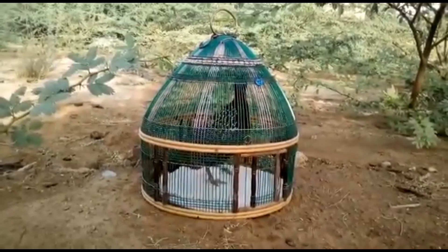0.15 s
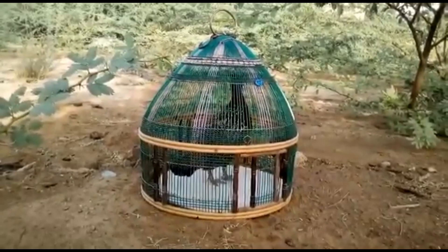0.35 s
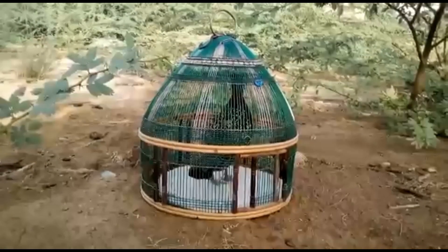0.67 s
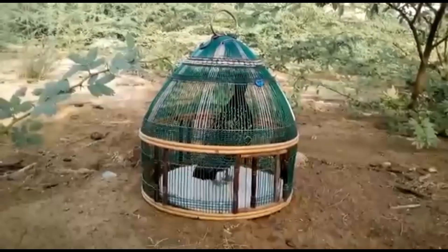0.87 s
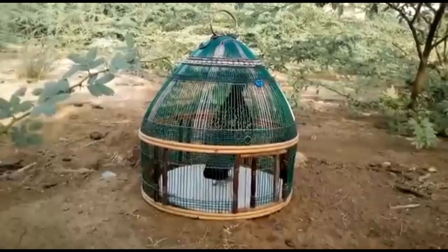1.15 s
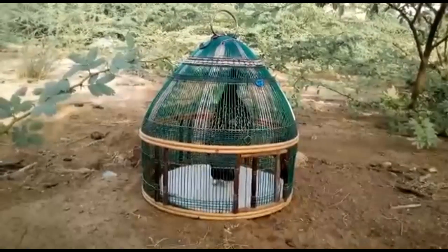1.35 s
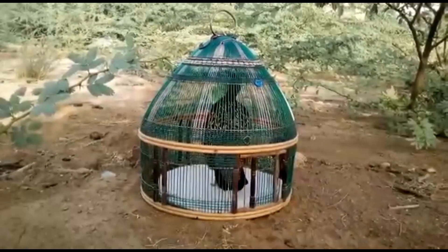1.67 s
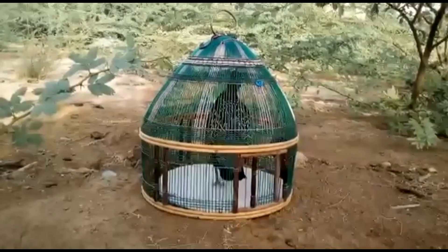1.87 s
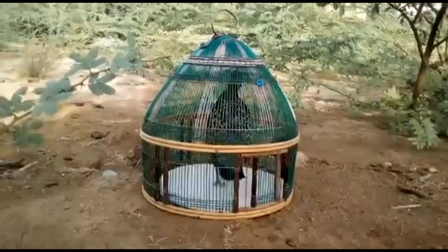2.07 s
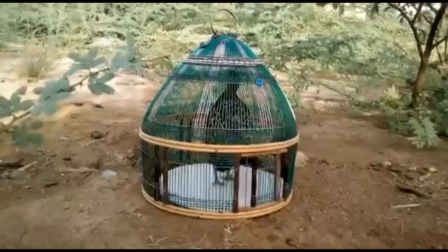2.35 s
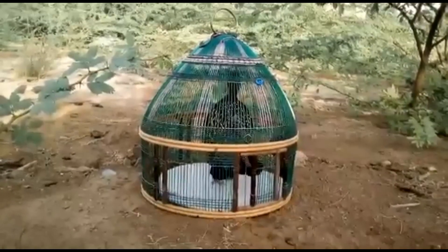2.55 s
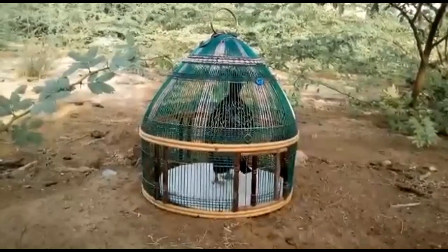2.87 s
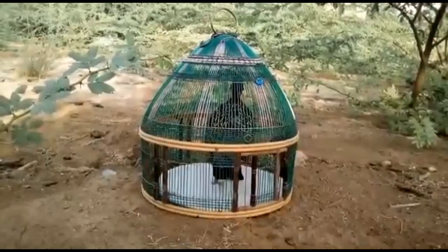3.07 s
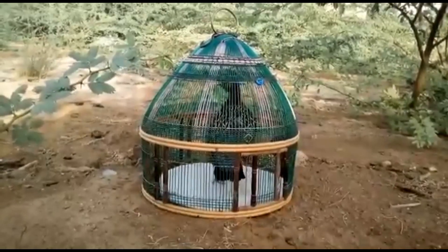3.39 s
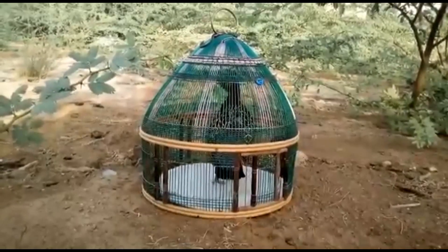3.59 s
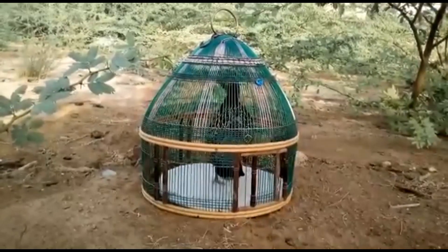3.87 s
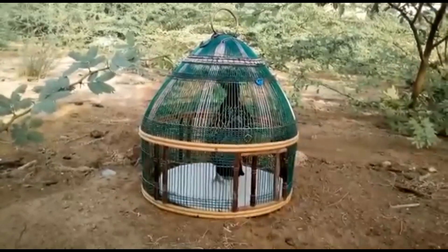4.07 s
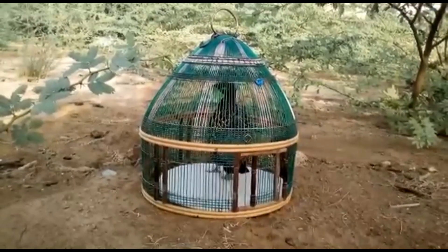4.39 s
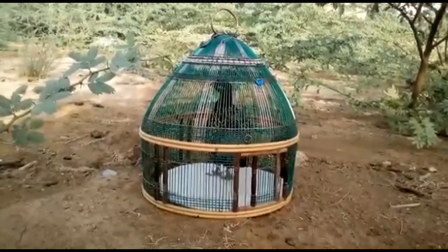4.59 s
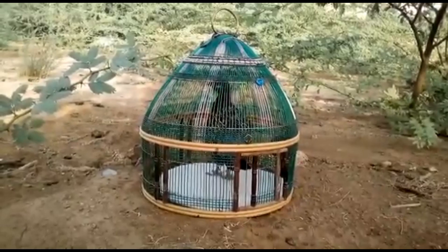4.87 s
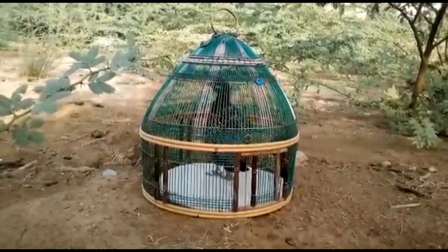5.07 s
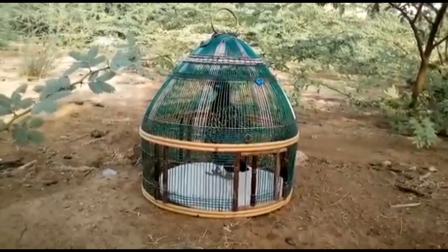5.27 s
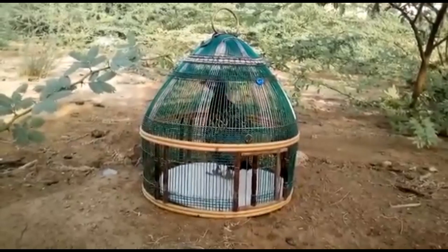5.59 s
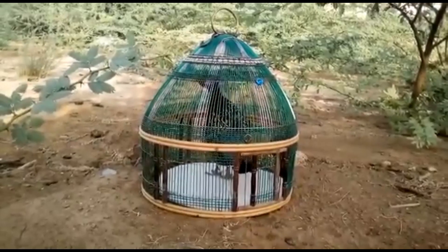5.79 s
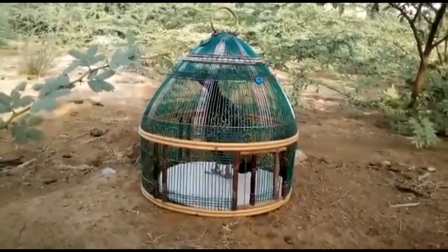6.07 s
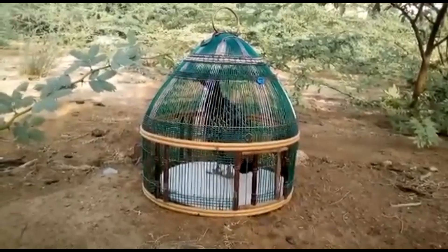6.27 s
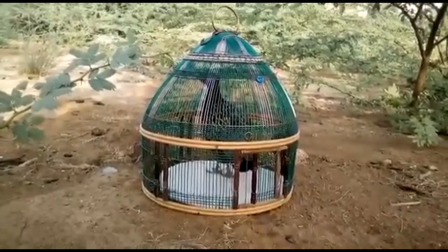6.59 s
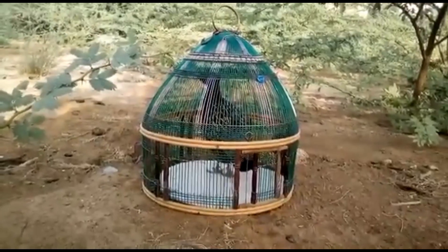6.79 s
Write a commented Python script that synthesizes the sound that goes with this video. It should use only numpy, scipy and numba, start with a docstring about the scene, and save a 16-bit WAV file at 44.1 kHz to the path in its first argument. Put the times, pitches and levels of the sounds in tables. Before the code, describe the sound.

A caged francolin bursts into loud, grating, overloading rasps after a sharp cluck, while distant birds pipe and twitter over a faint low motor hum.

```python
"""Open ground with scrub around: a francolin in a small cage calls close to the microphone.
It gives a cluck, grating rasps and thin whistles, which the scrub throws back blurred.
Far off a bird pipes in phrases, small birds twitter in noise-smeared sweeps, and motors hum as wavering lines;
faint ticks, distant rumble and microphone hiss fill in.
The recorder turns itself down under the calls and overloads on their peaks."""
import sys
import numpy as np
from scipy import signal
from scipy.fft import rfft, irfft, next_fast_len
from scipy.io import wavfile
from scipy.ndimage import uniform_filter1d
from numba import njit

SR = 44100
rng = np.random.default_rng(int(sys.argv[2]) if len(sys.argv) > 2 else 0)


def file_out(sig):
    """Save sig as 16-bit WAV at sys.argv[1]."""
    # one column per channel
    cols = np.atleast_2d(sig).T
    # limit, then scale
    lim = np.clip(cols, -1, 1)
    pcm = np.round(lim * 32767).astype(np.int16)
    wavfile.write(sys.argv[1], SR, pcm)


def elevation(decibels):
    """Turn decibel levels (scalar or array-like) into linear amplitude ratios."""
    levels = np.asarray(decibels, float)
    return 10 ** (levels / 20)


N = 306054

# The caged bird, close; its levels stand before NEAR_DB.
# rasped syllables: start_s, end_s, attack_s, release_s, level_db, flap_start_hz, upper_start_hz, roughness (0-1)
RASPS = [(1.829, 1.875, .001, .012, -1.5, 261.6, 5910, 0.7),
         (2.256, 2.416, .007, .014, -5.5, 285.4, 5226, 0.62),
         (2.6059, 2.86, .026, 0.018, -5.5, 278.6, 5225, 0.69), (3.107, 3.206, .010, .014, -6, 264, 5080, 1),
         (3.265, 3.452, .009, 0.018, -6.5, 270.9, 5114, .9)]
# throat resonances of the rasp's breath: centre_hz, width_hz, level_db (before roughness scales it)
THROAT = [(4300, 590, -4.5), (3700, 500, -15.5), (5000, 230, -16.5), (2800, 900, -23), (1184.6, 1500, -44)]
# bands of the rasp below its main tone: pitch_hz, level_db, lag_cycles
LOW_BANDS = [(1584, -42, 0.38), (2602, -24, 0.34), (3150, -22, 0.93)]
# level curve of the opening cluck: time_s, level_db
CLUCK_LEVEL = [(1.786, -34.5), (1.789, -24), (1.791, -6.5), (1.808, -11), (1.8095, -18), (1.812, -13),
               (1.8145, -21), (1.819, -22), (1.827, -28)]
# colour of the cluck's partials: pitch_hz, level_db
CLUCK_COLOUR = [(800, -45), (1650, -11), (2500, -12), (3300, -13), (4200, -1), (5000, 0), (5900, -6),
                (6700, -14), (8000, -45)]
# whistles that break into the rasps or open them: start_s, length_s, top_hz, bend_hz, level_db
WHISTLES = [(1.828, 0.035, 6520, 1300, -9), (2.784, 0.037, 6385, 700, -12), (3.331, .0235, 6465, 350, -12)]
# Returns from the scrub.
# blurred echoes: delay_s, spread_s, level_db (before the leaves' filter)
ECHOES = [(0.168, 0.029, -51.5), (0.432, 0.046, -47), (.6, .12, -58)]
# The far bird; its pitches stand before scoop, sag and droop.
# piped notes without a first partial: start_s, length_s, second_start_hz, second_end_hz, second_level_db,
# third_relative_db, fourth_relative_db, catch_hz, catches_s (until they cease)
PIPING = [(0.1958, 0.066, 2940, 2800, -40, -1.5, -1, 115.4, 0.076),
          (.320, 0.083, 2830, 2790, -45.5, -8, 0, 80.3, 0.049),
          (1.209, 0.064, 2700, 2808, -42, 1.5, -2, 107, .04),
          (1.33, 0.07, 2750, 2777, -42.5, 5.5, 5, 74.4, 0.066),
          (1.452, 0.089, 2760, 2700, -43.5, 2, 4.5, 71.66, .07),
          (2.213, 0.058, 2740, 2690, -45.5, -10.5, -16, 90.7, .05),
          (2.494, 0.11, 2780, 2684, -39, -7, -13.5, 84, .06),
          (3.491, 0.098, 2680, 2552, -60, -8, 4, 80, 0.057)]
# slides that close a phrase: start_s, length_s, second_hz, second_level_db, third_relative_db, fourth_relative_db
SLIDES = [(.458, 0.262, 2800, -48.5, -2, 2.5), (1.6075, 0.175, 2702, -46, 3, 0),
          (3.650, .2, 2620, -60, 6, -12)]
# course of every slide: length_share, pitch_ratio, level_db
SLIDE_COURSE = [(0, 1, -2.5), (.12, 0.98, -1), (.42, .94, -3.5), (.6, 0.86, -4.5), (.75, .73, -16.5),
                (1, 0.86, -4)]
# Small birds.
# twittered sweeps: start_s, length_s, start_hz, middle_hz, end_hz, level_db (in the middle)
TWITTER = [(.322, 0.1, 4000, 4880, 3950, -53.5), (.685, 0.042, 4230, 4100, 4560, -55),
           (.733, .038, 3620, 4380, 3570, -49), (.812, 0.043, 4000, 4650, 3900, -51),
           (.862, 0.05, 3700, 4380, 3900, -53.5), (.920, 0.045, 3950, 4420, 3600, -52),
           (1.040, 0.057, 4950, 4700, 4000, -62), (1.055, 0.034, 4020, 4400, 3900, -55),
           (1.632, 0.025, 4300, 4670, 4870, -45), (1.662, 0.031, 4883, 5273, 5150, -56),
           (1.695, 0.038, 5280, 4500, 3720, -47), (2.000, 0.055, 3780, 4960, 4000, -64),
           (2.172, 0.028, 4000, 4730, 3840, -60.5), (4.785, 0.031, 4020, 3730, 4600, -51.5),
           (4.815, .055, 4657, 4750, 4540, -63), (5.160, 0.023, 4070, 4590, 4100, -43),
           (5.190, 0.032, 4070, 5100, 5100, -53), (5.220, 0.04, 4960, 4260, 3920, -45),
           (5.255, 0.028, 3980, 4300, 5000, -48.5), (5.310, .027, 4800, 4700, 4050, -49),
           (5.362, 0.032, 4420, 4025, 4600, -48), (5.405, 0.04, 4490, 3900, 3100, -58.5),
           (5.290, 0.019, 4300, 4500, 4700, -58), (5.860, .014, 4524, 4900, 5200, -60),
           (5.878, 0.026, 4420, 3680, 4100, -58), (5.910, 0.027, 4300, 3680, 4600, -54),
           (5.945, 0.021, 3360, 3560, 2440, -61), (6.262, .03, 3780, 4330, 5800, -57.5),
           (6.292, 0.026, 5750, 5640, 5160, -65), (6.320, .025, 4330, 4200, 3900, -54.5),
           (6.345, .025, 4250, 4000, 4040, -59), (6.375, 0.024, 4000, 4400, 4720, -57.5),
           (6.848, .012, 4200, 4790, 5100, -53), (6.864, .022, 4400, 3820, 3850, -57),
           (6.898, .01, 3840, 4100, 4300, -57.5), (6.905, .024, 3700, 3900, 4850, -51),
           (6.325, 0.019, 4300, 4900, 5200, -61), (6.528, .03, 3610, 3920, 4800, -64)]
# plain faint whistles: start_s, length_s, start_hz, middle_hz, end_hz, level_db (in the middle)
PEEPS = [(1.030, 0.059, 2700, 2460, 2370, -56.5), (1.030, 0.056, 3400, 3760, 3130, -53),
         (1.082, 0.068, 2620, 2844, 2700, -54), (1.118, 0.039, 3720, 3800, 3450, -55.5),
         (4.764, 0.046, 2430, 2400, 2420, -57.5), (5.200, 0.07, 2480, 2360, 2470, -64),
         (5.540, .03, 2620, 2610, 2600, -68.5), (6.205, 0.051, 2326, 2390, 2200, -63),
         (6.510, 0.046, 5160, 5130, 5170, -61.5)]
# faint ticks: start_s, level_db (at the onset), pitch_hz
TICKS = [(.330, -29, 3320), (.344, -36, 4200), (.482, -32, 3800), (.519, -36, 3550), (5.6644, -44.5, 5780),
         (5.6715, -37, 5790), (5.7404, -44, 5990), (5.7915, -44, 3900), (5.9646, -34.5, 2900)]
# The distance.
# lasting low motor line: time_s, pitch_hz, level_db
HUM_LOW = [(0, 101.5, -55), (.3, 101.7, -48), (1.25, 101.7, -47.5), (1.8, 101.6, -56.5), (2.7, 103, -57.5),
           (3.0, 102, -49), (3.6, 101.5, -51.5), (4.55, 101, -52), (4.76, 93, -48), (5.06, 100, -52),
           (6.94, 101.4, -49)]
# passing motor lines, one table each: time_s, pitch_hz, level_db
HUM_PASSING = [
    [(2.7, 147, -55), (2.92, 146, -47), (3.5, 141.8, -48.5), (4.34, 135.3, -46.5), (4.7, 135, -56)],
    [(4.7, 179.3, -51.5), (5.63, 171, -54.5), (6.94, 174, -57)],
]
# lines above the low one: pitch_multiple, relative_db
HUM_ORDERS = [(2, -19), (2.5, -15.5), (3, -14)]
# colour of rumble and hiss: pitch_hz, relative_db (per Hz)
AIR_COLOUR = [(12, -52), (20, -22), (38, -15.5), (80, -3), (106, 0), (252, -7), (668, -21), (908, -24.5),
              (2920, -26), (4320, -22.5), (6550, -31), (8190, -46.5), (13100, -43.5), (14300, -37),
              (15500, -49.5)]

NEAR_DB = 11.5   # the near bird stands this much above its own table levels
MAIN_HZ, MAIN_SAG_HZ_PER_S = 4208, 130
MAIN_ARCH_HZ, MAIN_ARCH_S = 128.6, .075   # the main tone rises and drops back early in a syllable
UPPER_CLIMB_HZ_PER_S, FLAP_SAG_HZ_PER_S = 2500, 60
UPPER_START_DB, UPPER_FULL_DB, UPPER_GROWS_S = -14.5, -9, 0.12
RESUMED_UPPER_HZ, RESUMED_UPPER_DB, RESUMED_FLAP_HZ, RESUMED_DB = 5330, -8, 260.5, -0.5   # after a whistle
RASP_START_DB, RASP_END_DB = -21.5, -29   # added at the very ends
RASP_FADE_S, RASP_FADE_DB = .035, -3   # slight fade towards the end
LOW_ONSET_DB, LOW_ONSET_S = 16.5, 0.012   # the lowest band flares as a syllable opens
STROKE_FLOOR, STROKE_SHARPNESS = .25, 3.0   # level between strokes; narrowness
EVENING = .65   # share of the level swings that steady pressure irons out
CLUCK_START_HZ, CLUCK_END_HZ, CLUCK_FALL_S = 1092, 813.4, 0.0049
CLUCK_BREATH_DB, CLUCK_BREATH_RISE_DB, CLUCK_BREATHY_S = -12.5, 24.5, 1.8115   # breath over voice; when it rises
WHISTLE_TOP, WHISTLE_DIP_DB = 0.78, -2   # share of the length at the top; level change there
WHISTLE_PLUNGE_HZ = 2200   # the pitch falls back to the rasp as the whistle ends
OVERLAP_S = .002   # the rasp lasts this long into the whistle
SCRUB_DB, SCRUB_T60_S = -26.5, 0.35   # wash level before the leaves' filter; decay
PIPING_PEAK, PIPING_SWELL_DB = 0.65, 9   # loudest at this share of the note
FIFTH_DB = -15   # fifth partial relative to the fourth
SLIDE_DULLS_DB = -16   # added to the upper partials by the end of a slide
FIRST_CATCH_S, CATCH_CLICK_DB = 0.0094, -6   # the voice first shuts this soon; each reopening clicks
SLIDE_CATCH_HZ, SLIDE_CATCHES_S = 78, .055
TWITTER_SWELL_DB = 2.5
AIR_DB = -47


def rasps():
    """The membrane whistles in strokes: each swells, climbs and breaks off; side bands answer later in the cycle."""
    out = np.zeros(N)
    for start, end, attack_s, release_s, level, flap_start_hz, upper_start_hz, rough in RASPS:
        at, gate, t = span(start, end - start, edge_s=0.0019)
        left = end - start - t
        db = level + RASP_START_DB * np.clip(1 - t / attack_s, 0, 1) ** 2
        db += RASP_END_DB * np.clip(1 - left / release_s, 0, 1)
        db += RASP_FADE_DB * np.clip(1 - left / RASP_FADE_S, 0, 1)
        flap_hz = flap_start_hz - FLAP_SAG_HZ_PER_S * t
        main_arch = np.sin(np.pi * np.minimum(t / MAIN_ARCH_S, 1) ** 2)
        main_hz = MAIN_HZ - MAIN_SAG_HZ_PER_S * t + MAIN_ARCH_HZ * main_arch
        upper_hz = upper_start_hz + UPPER_CLIMB_HZ_PER_S * t
        upper_db = UPPER_FULL_DB + (UPPER_START_DB - UPPER_FULL_DB) * np.clip(1 - t / UPPER_GROWS_S, 0, 1)

        # past the middle of a whistle inside the syllable, the rasp takes a new setting
        resumed = sum((start < s) & (at / SR > s + length / 2) for s, length, *_ in WHISTLES) > 0
        upper_hz[resumed] = RESUMED_UPPER_HZ
        upper_db[resumed] = RESUMED_UPPER_DB
        flap_hz[resumed] = RESUMED_FLAP_HZ
        db += RESUMED_DB * resumed

        cycle = np.cumsum(flap_hz * (1 + .055 * rough * drift(150, len(at)))) / SR + .2
        bend = .016 * drift(30, len(at))   # all bands bend together as the neck moves

        def strokes(hz, lag, climb):
            """One tone pulsed and bent by the flap cycle; rms 1."""
            place = (cycle - lag) % 1
            swell = STROKE_FLOOR + np.sin(np.pi * place ** 1.2) ** STROKE_SHARPNESS
            flicker = elevation(4.5 * rough * drift(600, len(at)))
            wobble = 1 + climb * (place - .55) + bend + .02 * rough * drift(500, len(at))
            tone = np.sin(turns(uniform_filter1d(hz * wobble, size=12)))
            return rms_one(swell * flicker * tone)

        voice = strokes(main_hz, 0, climb=0.29)
        voice += elevation(upper_db) * strokes(upper_hz, 0.71, climb=0.3)
        for hz, level_db, lag in LOW_BANDS:
            flare_db = LOW_ONSET_DB * np.exp(-t / LOW_ONSET_S) * (hz < 2000)
            voice += elevation(level_db + flare_db) * strokes(hz, lag, climb=0.14)
        breath = rng.standard_normal(len(at))
        breath *= .5 + np.sin(np.pi * (cycle - .1)) ** 2   # the air comes in puffs with the strokes
        for hz, width_hz, level_db in THROAT:
            voice += rough * elevation(level_db) * twice(breath, hz, width_hz)
        voice += elevation(-20) * twice(breath, 1.06 * upper_hz, 460)
        voice /= smooth_power(voice, size=160) ** (EVENING / 2)
        out[at] += gate * elevation(db) * rms_one(voice)
    for start, length, *_ in WHISTLES:   # the rasp is silent while the bird whistles
        at, gate, _ = span(start + OVERLAP_S, length - OVERLAP_S, edge_s=.002)
        out[at] *= 1 - gate
    return out


def cluck():
    """A falling stack of unsteady partials with breath in the throat."""
    at, gate, (db,) = note(CLUCK_LEVEL, edge_s=0.0021)
    t = at / SR
    hz = CLUCK_END_HZ + (CLUCK_START_HZ - CLUCK_END_HZ) * np.exp(-((t - t[0]) / CLUCK_FALL_S) ** 2)
    breath_db = CLUCK_BREATH_DB + CLUCK_BREATH_RISE_DB / (1 + np.exp((CLUCK_BREATHY_S - t) / .0015))
    phase = turns(hz * (1 + .02 * drift(400, len(at))))
    stack = np.zeros(len(at))
    for k in range(2, 11):
        partial_db = at_hz(CLUCK_COLOUR, k * hz) + 3.5 * drift(300, len(at))
        stack += elevation(partial_db) * np.sin(k * phase + k * k)
    air_flow = rng.standard_normal(len(at))
    breath = twice(air_flow, 4100, 800)
    breath += elevation(-16) * twice(air_flow, 4900, 600)
    breath += elevation(-14.5) * twice(air_flow, 3100, 900)
    voice = rms_one(stack) * elevation(-breath_db) + breath
    out = np.zeros(N)
    out[at] = gate * elevation(db) * voice / np.sqrt(smooth_power(voice, size=200))   # steady pressure evens the level
    return out


def whistles():
    """A clean tone that takes the rasp's place for a moment, with a fading octave below and breath in the throat."""
    out = np.zeros(N)
    for start, length, top_hz, bend_hz, level in WHISTLES:
        at, gate, t = span(start, length, edge_s=0.0014)
        off_top = (t / length - WHISTLE_TOP) ** 2
        plunge = WHISTLE_PLUNGE_HZ * np.exp((t - length) / .0012)
        hz = top_hz - bend_hz * off_top - plunge
        db = level + WHISTLE_DIP_DB * np.exp(-off_top / .04)
        phase = turns(hz / 2)
        octave_below = elevation(-21.5) * np.exp(-t / 0.0097) * np.sin(phase)
        gate = gate * elevation(.8 * drift(200, len(at)))
        breath = elevation(-20.5) * twice(rng.standard_normal(len(at)), 4200, 560)
        out[at] += gate * elevation(db) * (np.sqrt(2) * (np.sin(2 * phase) + octave_below) + breath)
    return out


def scrub(x):
    """Leaves scatter a dying wash; banks of trees return blurred echoes."""
    t = np.arange(int(1.2 * SR)) / SR
    wash = (t > .01) * elevation(-60 * t / SCRUB_T60_S)
    shape = elevation(SCRUB_DB) * wash / np.sqrt(np.sum(wash ** 2))
    for delay_s, spread_s, db in ECHOES:
        clump = np.exp(-.5 * ((t - delay_s) / spread_s) ** 2)
        shape = np.hypot(shape, elevation(db) * clump / np.sqrt(np.sum(clump ** 2)))
    scatter = shape * rng.standard_normal(len(t))
    scatter *= elevation(3.0 * drift(25, len(t)))   # bushes stand unevenly
    # the main tone is beamed forward, less of it returns
    scatter -= .65 * resonate(scatter, np.full(len(t), 4000.), 1400., SR)
    leaves = signal.butter(2, [2600, 7000], "band", fs=SR, output="sos")   # leaves return only the treble
    return signal.fftconvolve(x, signal.sosfilt(leaves, scatter))[:N]


def piping():
    """Short notes swell and glide a little; the last note of a phrase slides down, dulls and turns up."""
    out = np.zeros(N)
    for start, length, start_hz, end_hz, db, third_db, fourth_db, catch_hz, catches_s in PIPING:
        at, gate, t = span(start, length, edge_s=.0015)
        level = db - PIPING_SWELL_DB * (t / length - PIPING_PEAK) ** 2
        levels = level + np.c_[[0, third_db, fourth_db, fourth_db + FIFTH_DB]]
        hz = start_hz + (end_hz - start_hz) * t / length
        out[at] += gate * piped(t, hz, levels, catch_hz, catches_s)
    share, ratio, slide_db = np.transpose(SLIDE_COURSE)
    for start, length, hz, db, third_db, fourth_db in SLIDES:
        at, gate, t = span(start, length, edge_s=.0015)
        level = db + np.interp(t / length, share, slide_db)
        upper = level + SLIDE_DULLS_DB * (t / length) ** 2
        levels = level, upper + third_db, upper + fourth_db, upper + fourth_db + FIFTH_DB
        sliding_hz = hz * uniform_filter1d(np.interp(t / length, share, ratio), size=600)
        out[at] += gate * piped(t, sliding_hz, levels, SLIDE_CATCH_HZ, SLIDE_CATCHES_S)
    return out


def piped(t, hz, levels, catch_hz, catches_s):
    """Partials two to five of a clear voice that catches in quick beats, widely as a note starts."""
    gap = .12 + .45 * np.exp(-t / .02)   # share of each beat that is shut
    beat = (catch_hz * (t - FIRST_CATCH_S) * (1 + .04 * drift(60, len(t)))) % 1
    depth = (t > FIRST_CATCH_S / 2) * np.exp(-(t / catches_s) ** 6)
    catch = uniform_filter1d((beat < gap) * (t > FIRST_CATCH_S) * depth, size=60)
    sag = uniform_filter1d(catch, size=200)
    ending = np.exp((t - t[-1]) / 0.0042)   # the note droops and fades as it closes
    # the pitch scoops up at first and sags round each catch
    phase = turns(hz / 2 * (1 - .07 * sag - .075 * ending - .03 * np.exp(-t / .02)))
    reopening = np.exp(-((beat - gap) / catch_hz / .0008) ** 2)
    click = depth * reopening * twice(rng.standard_normal(len(t)), 4300, 3000)
    voice = np.zeros(len(t))
    for k, db in enumerate(levels, start=2):
        voice += np.sqrt(2) * elevation(db + 1.5 * drift(200, len(t))) * np.sin(k * phase)
    return (1 - 0.83 * catch) * (1 - 0.39 * ending) * voice + elevation(levels[0] + CATCH_CLICK_DB) * click


def twitter():
    """Two-voiced sweeps and plain peeps; near leaves smear both."""
    out = sweeps(TWITTER, upper_db=-10) + sweeps(PEEPS, upper_db=-np.inf)
    t = np.arange(4000) / SR
    smear = rng.standard_normal(len(t)) * np.exp(-t / 0.023)
    return out + elevation(-7) * signal.fftconvolve(out, smear / np.sqrt(np.sum(smear ** 2)))[:N]


def sweeps(rows, upper_db):
    """Bowed glides; the other side of the syrinx sings a weaker line that swings wider."""
    out = np.zeros(N)
    for start, length, start_hz, middle_hz, end_hz, level in rows:
        at, gate, t = span(start, length, edge_s=0.002)
        bow = arch(t / length)
        straight_hz = start_hz + (end_hz - start_hz) * t / length
        hz = straight_hz + (middle_hz - (start_hz + end_hz) / 2) * (1 + bow)
        upper = elevation(upper_db + 4.0 * drift(80, len(at))) * np.sin(turns(4000 + 1.3 * (hz - 3700)))
        db = level + TWITTER_SWELL_DB * bow + 2.6 * drift(120, len(at))
        out[at] += gate * np.sqrt(2) * elevation(db) * (np.sin(turns(hz)) + upper)
    return out


def ticks():
    """Dry clicks of about a millisecond: sines that die at once."""
    out, t = np.zeros(N), np.arange(200) / SR
    for s, db, hz in TICKS:
        first = round(s * SR)
        out[first:first + 200] += elevation(db) * np.exp(-t / 0.00058) * np.sin(2 * np.pi * hz * t)
    return out


def hum():
    """Far motors: low lines that waver in pitch and level."""
    out = np.zeros(N)
    for rows, orders in [(HUM_LOW, HUM_ORDERS)] + [(rows, []) for rows in HUM_PASSING]:
        at, gate, (hz, db) = note(rows, edge_s=.02)
        phase = turns(hz * (1 + 0.013 * drift(21, len(at))))
        for multiple, order_db in [(1, 0)] + orders:
            level = elevation(db + order_db + 0.6 * drift(24, len(at)))
            out[at] += gate * np.sqrt(2) * level * np.sin(multiple * phase)
    return out


def air():
    """Rumble of the distance, hiss of the microphone and a thin band of hiss near the top, from shaped noise."""
    size = next_fast_len(N)
    hz = np.maximum(np.arange(size // 2 + 1) * SR / size, 1)
    colour_db = at_hz(AIR_COLOUR, hz) + 5.0 * np.exp(-((hz - 14600) / 450) ** 4)
    noise = irfft(rfft(rng.standard_normal(size)) * elevation(colour_db), size)[:N]
    return elevation(AIR_DB) * rms_one(noise)


def span(start, length, edge_s):
    """Sample range, soft-edged gate and time since the start of one sound."""
    at = np.arange(int(start * SR), min(int((start + length) * SR), N))
    t = at / SR - start
    gate = np.sin(np.clip(np.minimum(t, length - t) / edge_s, 0, 1) * np.pi / 2) ** 2
    return at, gate, t


def note(rows, edge_s):
    """Sample range, gate and interpolated columns of a curve."""
    s, *columns = np.transpose(rows)
    at, gate, _ = span(s[0], s[-1] - s[0], edge_s)
    return at, gate, [np.interp(at / SR, s, c) for c in columns]


def arch(share):
    """0 in the middle of a sound, -1 at both ends."""
    return -(2 * share - 1) ** 2


def drift(rate, size):
    """Slow chance of spread about 1: rate random points per second joined by straight lines."""
    steps = np.arange(size) * rate / SR
    points = rng.standard_normal(int(steps[-1]) + 2)
    return 1.2 * np.interp(steps, np.arange(len(points)), points)


def turns(hz):
    """Running phase of a gliding tone, from a random start."""
    return 2 * np.pi * (np.cumsum(hz) / SR + rng.random())


def rms_one(x):
    """Scale to rms 1."""
    return x / np.sqrt(np.mean(x ** 2) + 1e-20)


def smooth_power(x, size):
    """Running power, averaged twice over size samples."""
    return uniform_filter1d(uniform_filter1d(x ** 2, size=size), size=size)


def at_hz(points, hz):
    """Read a spectrum on a log-frequency axis."""
    points_hz, points_db = np.transpose(points)
    return np.interp(np.log(hz), np.log(points_hz), points_db)


@njit
def resonate(x, hz, width_hz, sr):
    """A two-pole resonance whose centre may move."""
    out, r = np.zeros(len(x)), np.exp(-np.pi * width_hz / sr)
    for i in range(2, len(x)):
        push = (1 - r * r) / 2 * (x[i] - x[i - 2])
        out[i] = push + 2 * r * np.cos(2 * np.pi * hz[i] / sr) * out[i - 1] - r * r * out[i - 2]
    return out


def twice(x, hz, width_hz):
    """The resonance applied twice keeps the valleys dark; rms 1."""
    hz = hz * np.ones(len(x))
    once = resonate(x, hz, 0.98 * width_hz, SR)
    return rms_one(resonate(once, hz, width_hz, SR))


def scene():
    """The caged bird with its echoes, over the far birds and the floor."""
    bird = elevation(NEAR_DB) * (rasps() + cluck() + whistles())
    return (bird + scrub(bird) + piping() + twitter() + ticks() + hum() + air())[None]


def roll_off(x):
    """The treble ends steeply here."""
    return signal.sosfilt(signal.butter(12, 15690, fs=SR, output="sos"), x)


def record(dry):
    """Gain control ducks loud sound and recovers in a tenth of a second; peaks clip hard."""
    level_db = 10 * np.log10(uniform_filter1d(dry[0] ** 2, size=220) + 1e-12)
    duck_db = 10.77 * np.clip((level_db + 24.5) / 22, 0, 1)
    fall = 110 * np.arange(N) / SR   # release in dB per s
    held_db = np.maximum.accumulate(duck_db + fall) - fall
    ducked = dry * elevation(-uniform_filter1d(held_db, size=130))
    return roll_off(np.clip(ducked, -.98, .98))


dry = scene()
out = record(dry)
file_out(out)
```